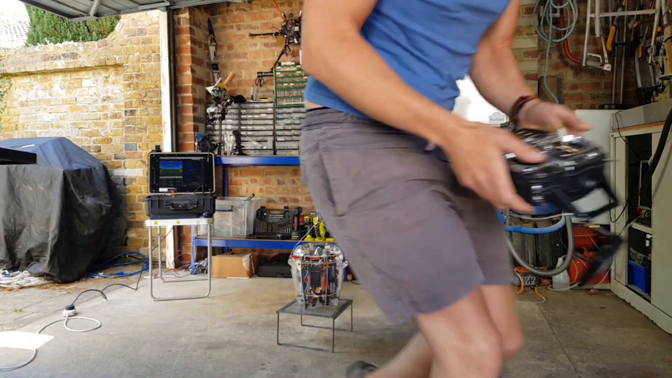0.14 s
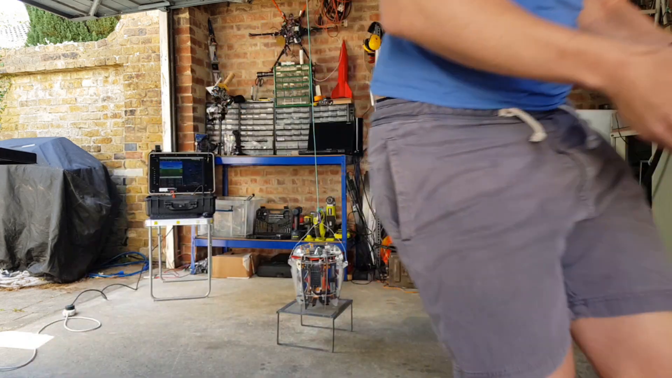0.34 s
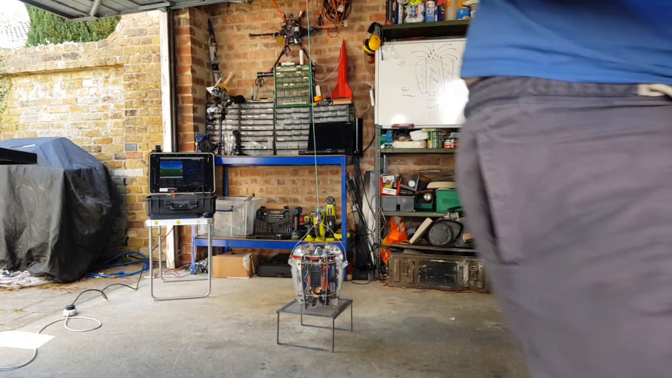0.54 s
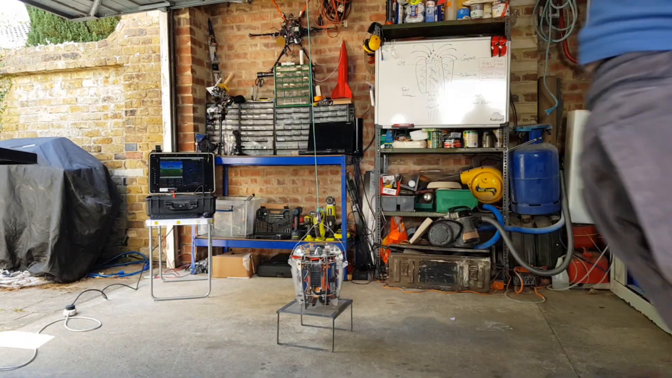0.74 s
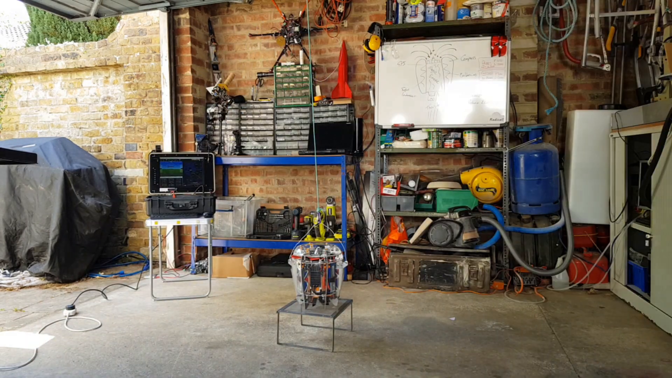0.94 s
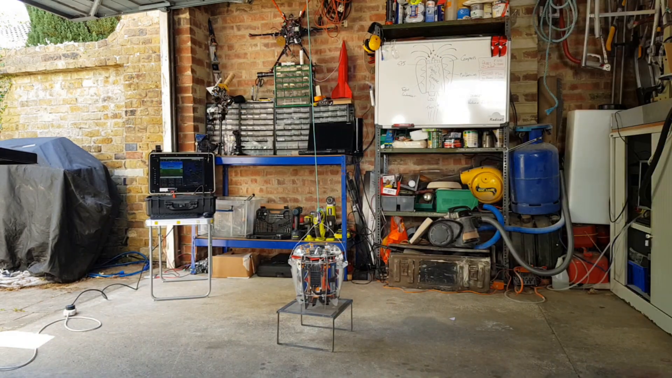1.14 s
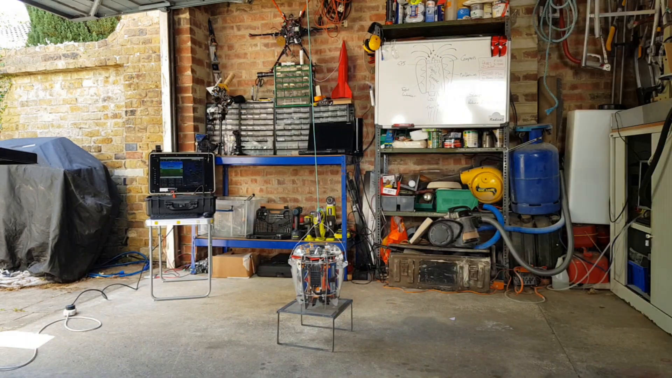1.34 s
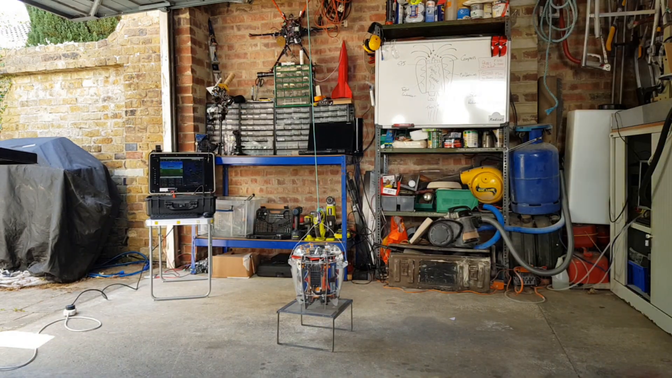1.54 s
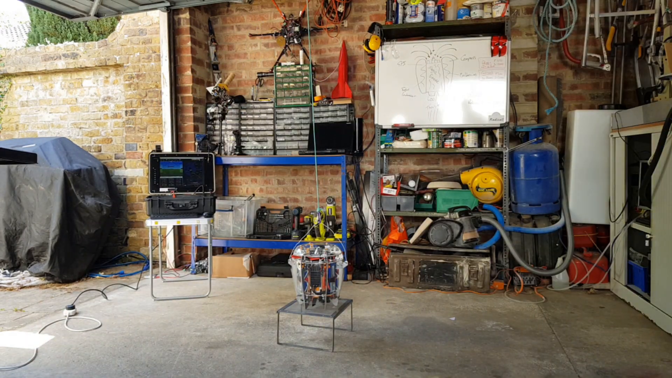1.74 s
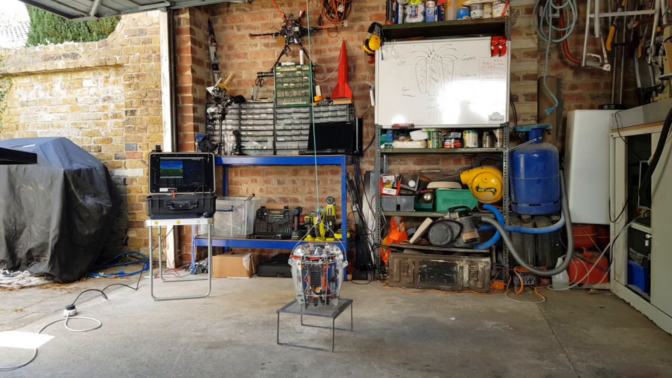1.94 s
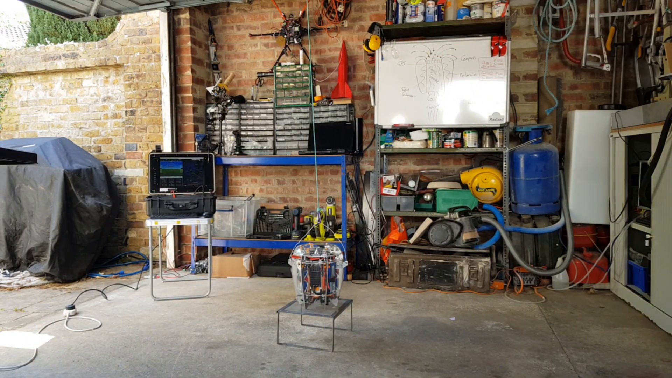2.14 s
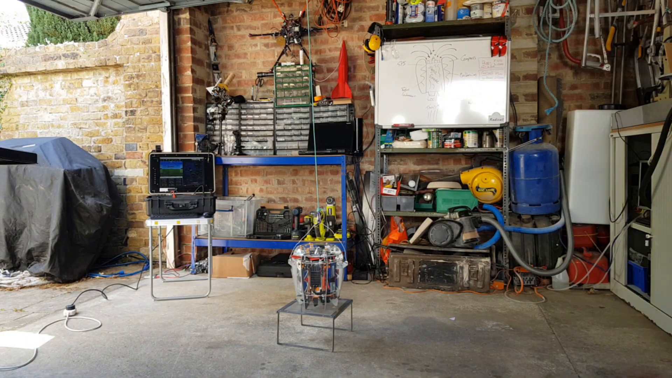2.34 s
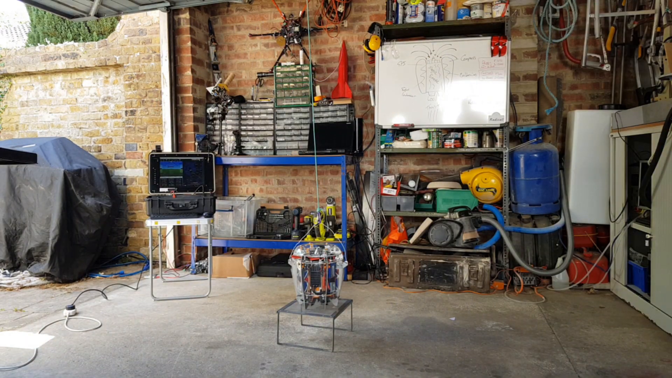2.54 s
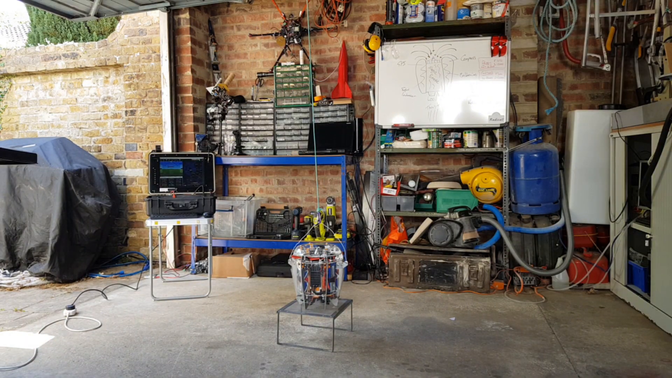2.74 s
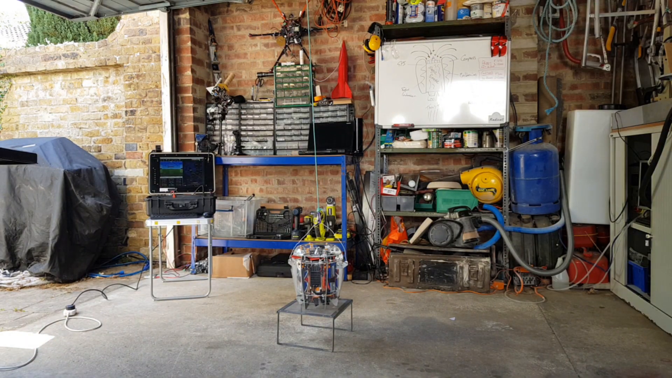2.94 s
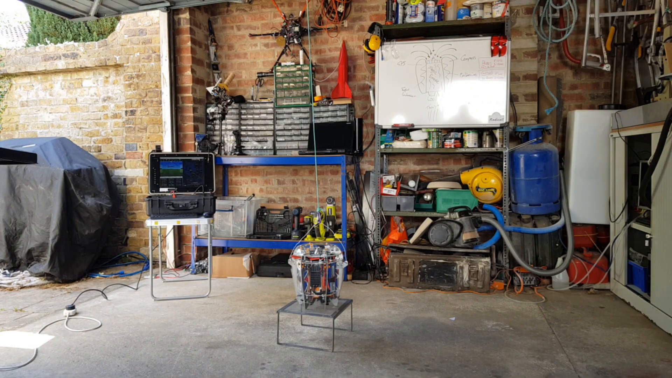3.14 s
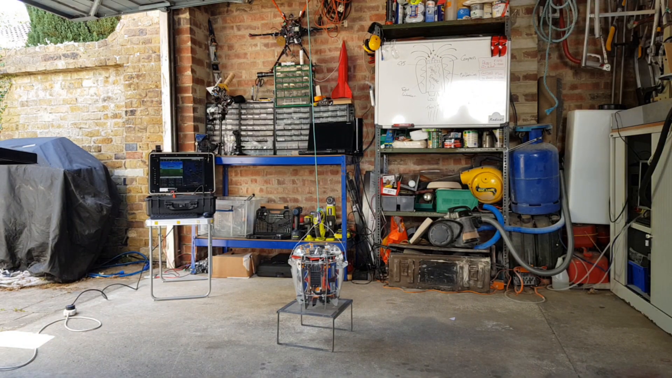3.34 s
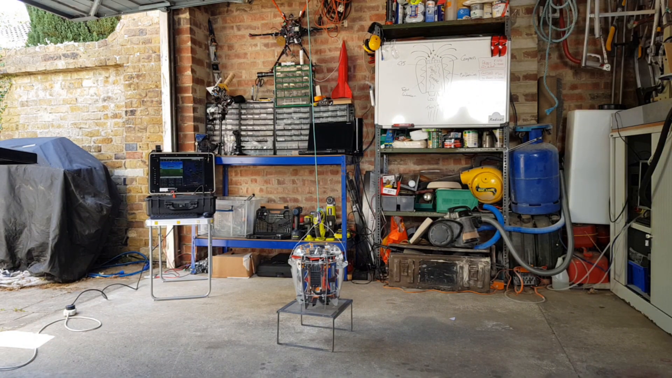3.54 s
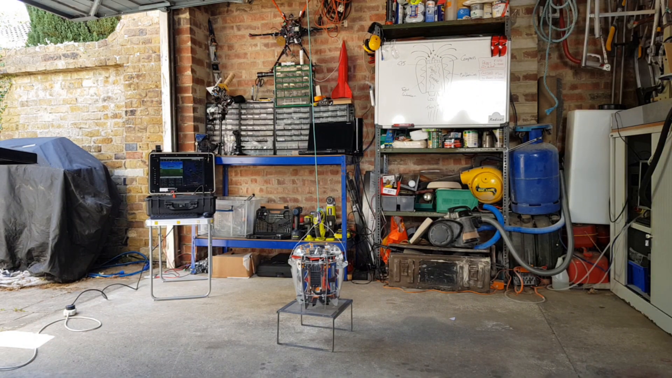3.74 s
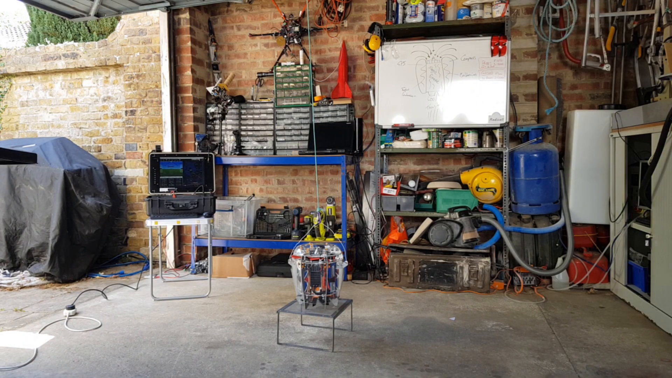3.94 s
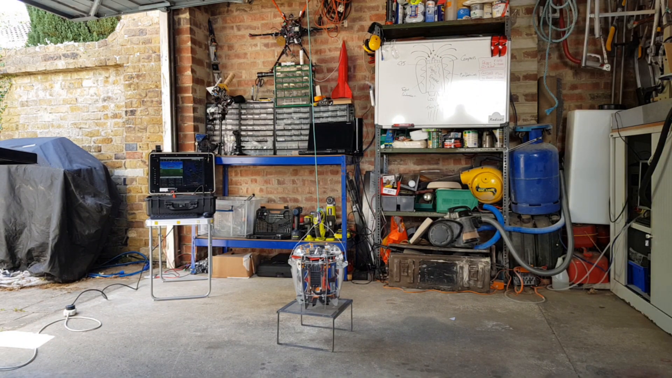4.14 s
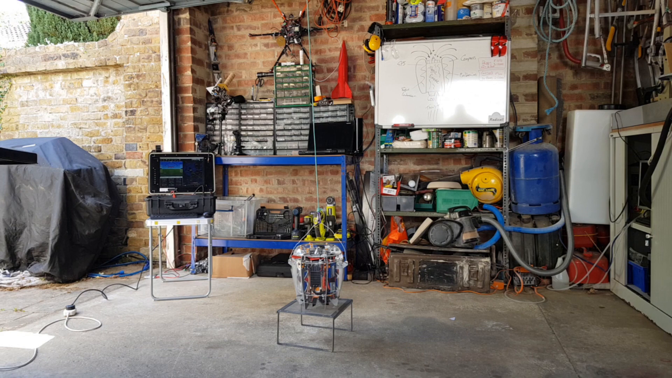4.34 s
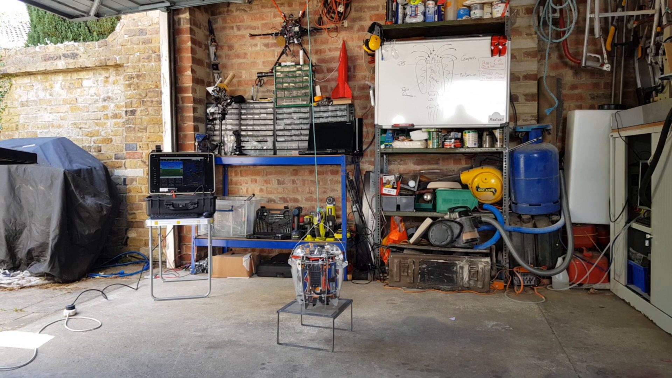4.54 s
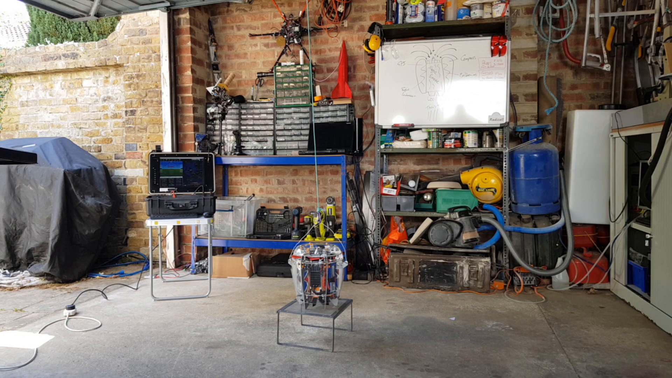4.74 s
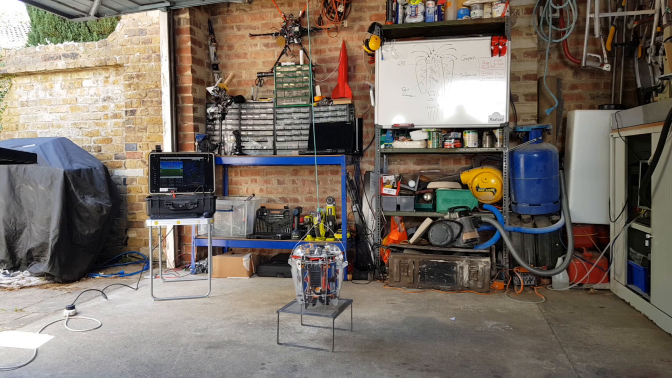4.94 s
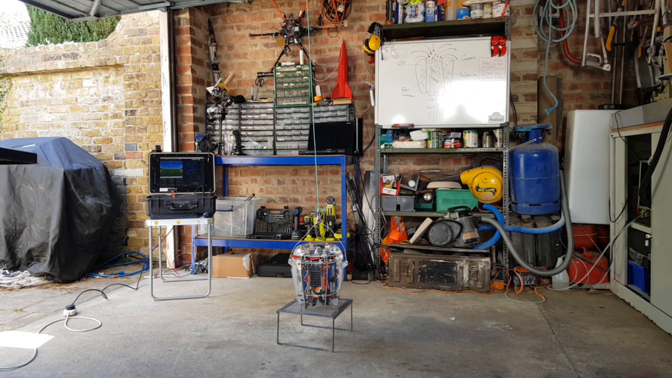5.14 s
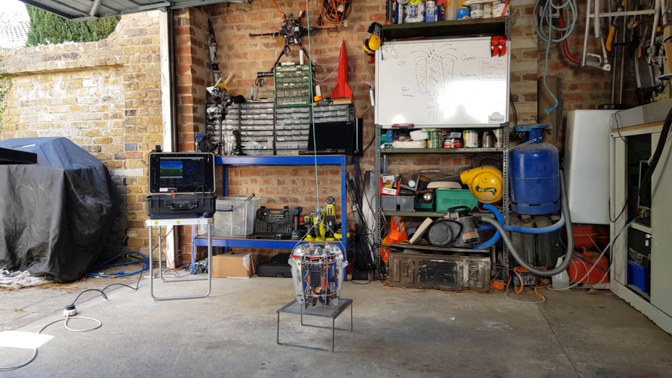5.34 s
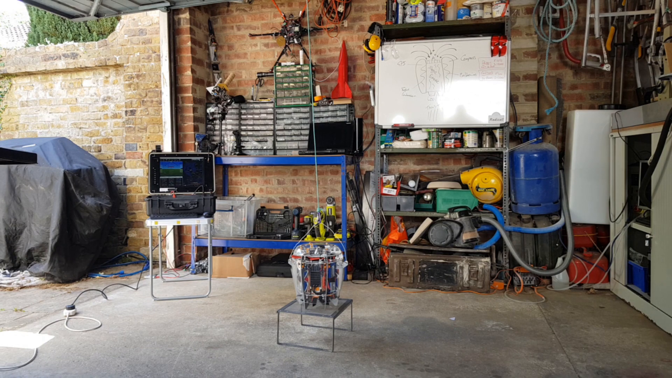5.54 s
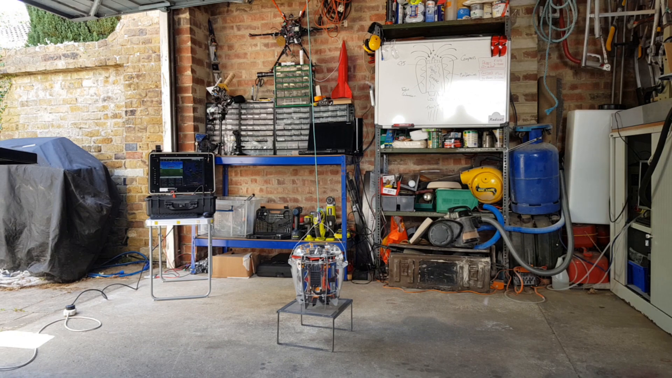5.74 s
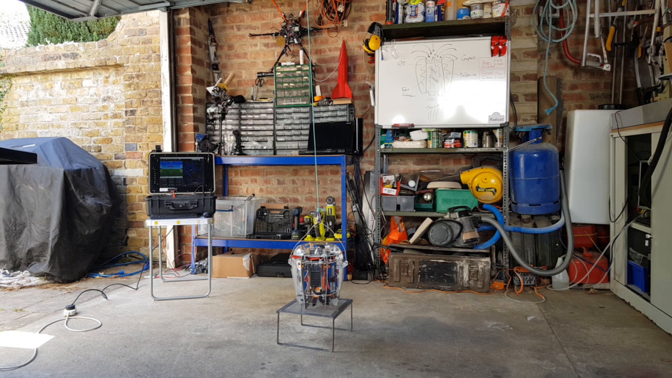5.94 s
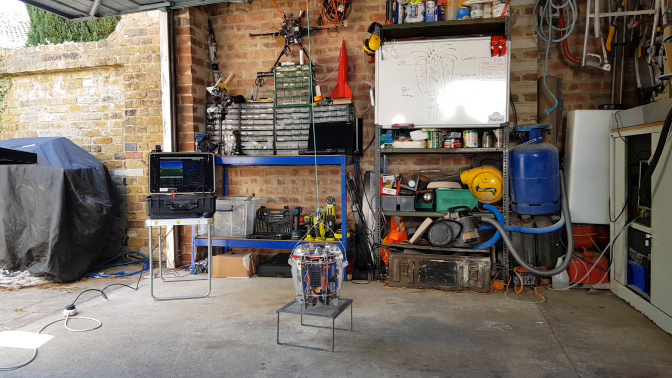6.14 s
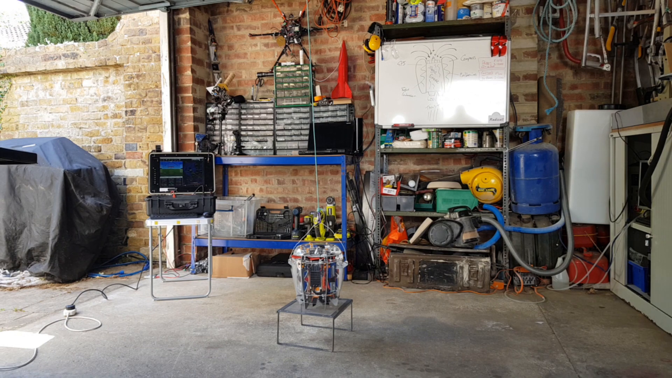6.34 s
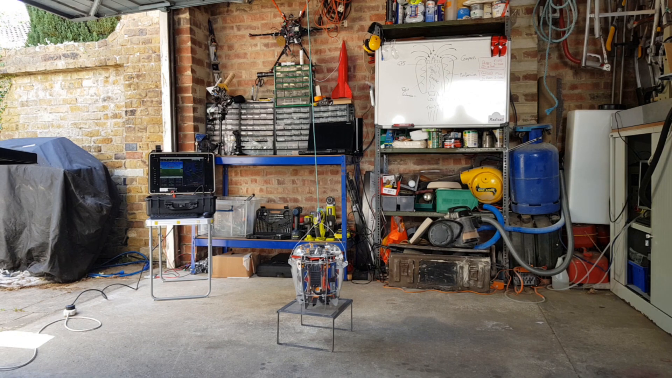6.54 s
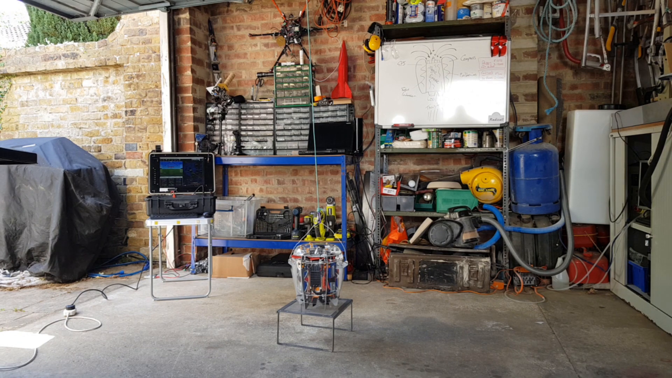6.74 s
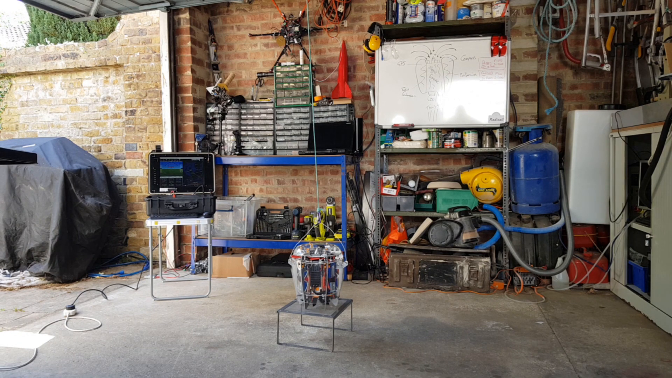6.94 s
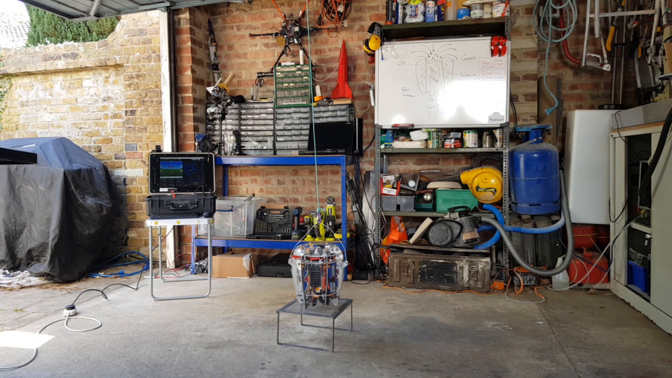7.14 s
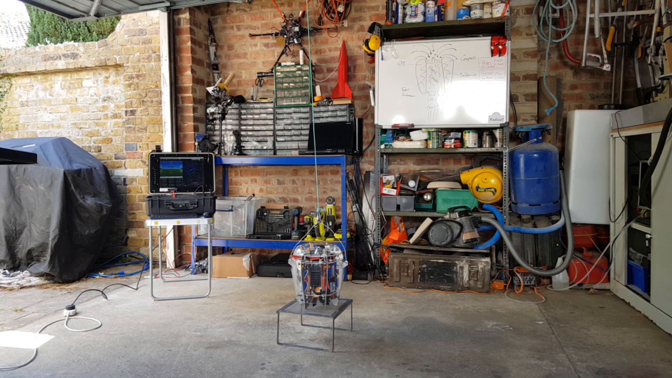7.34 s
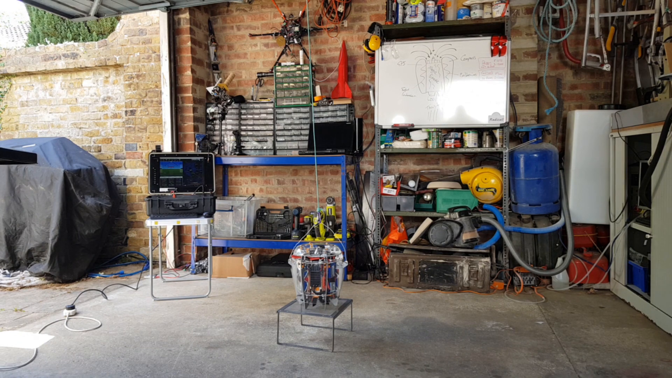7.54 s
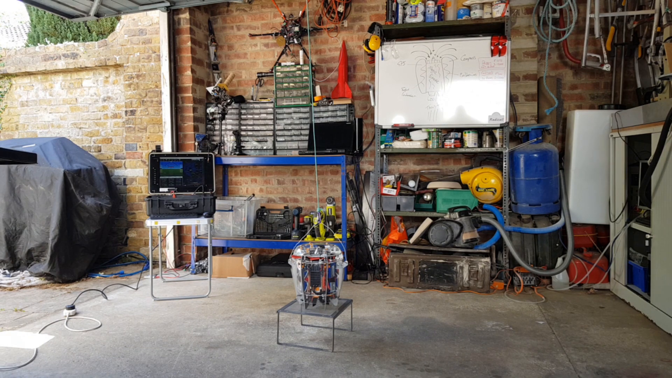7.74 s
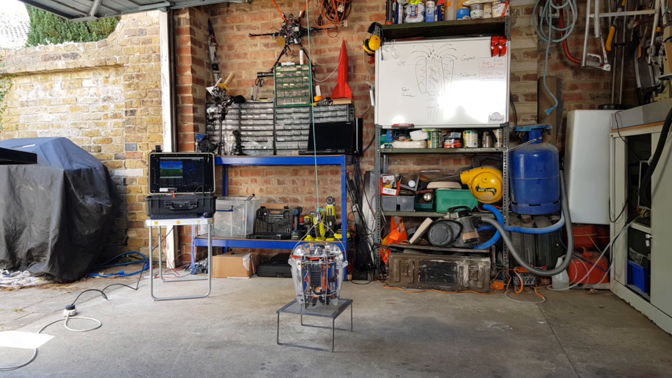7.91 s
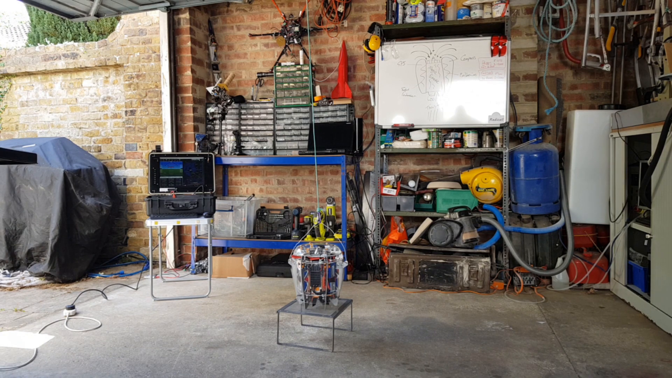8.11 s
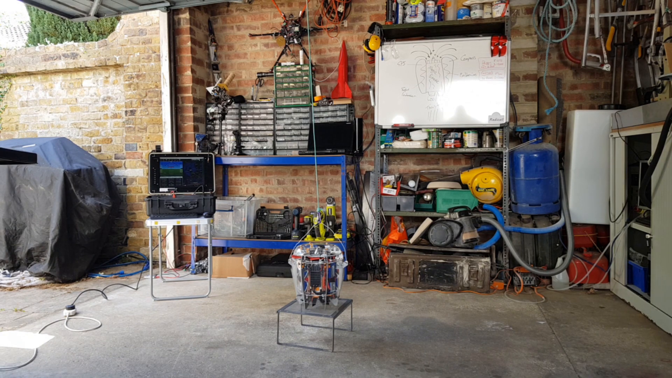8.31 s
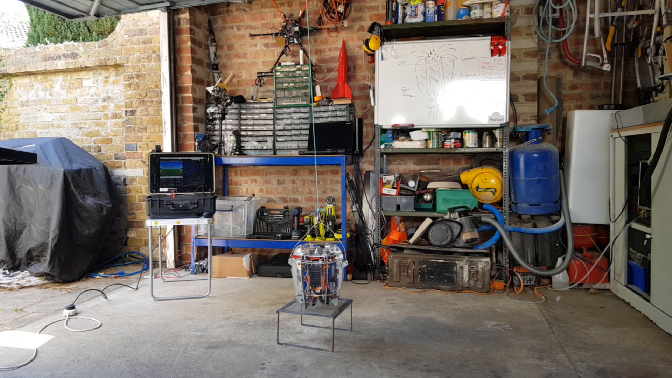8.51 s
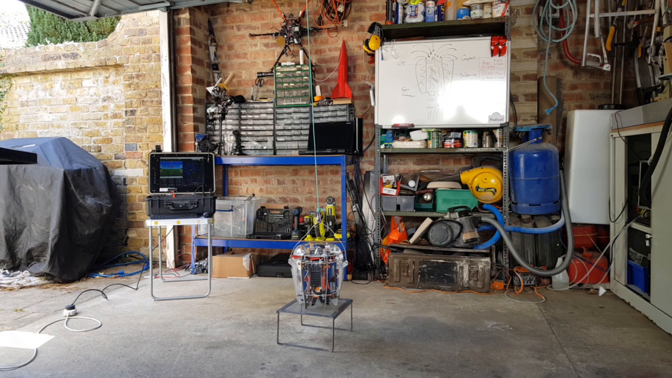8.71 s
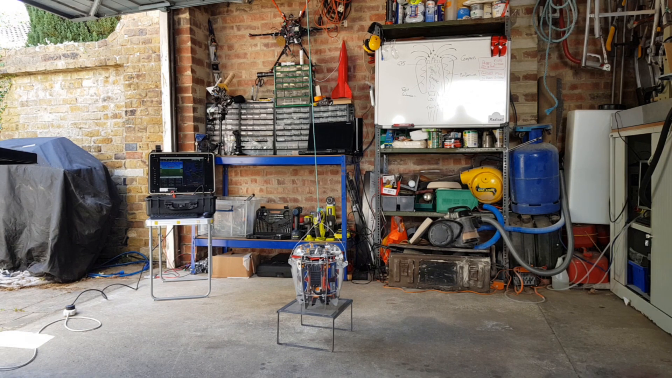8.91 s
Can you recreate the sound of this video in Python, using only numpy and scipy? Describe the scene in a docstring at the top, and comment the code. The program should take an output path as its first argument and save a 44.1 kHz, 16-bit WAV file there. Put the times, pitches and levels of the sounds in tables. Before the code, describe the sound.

Someone walks past and stops; after a pause, a drone's electric fan starts and climbs in steps, whining and hissing loudly.

```python
"""Footsteps pass in a brick garage, with scuffing soles, rustling clothes and a clicking transmitter.
The pilot stands still; a drone's twelve-blade electric ducted fan kicks in with a short buzz and
spools up in steps. Its blades whine, its shaft hums and its turbulent jet roars and hisses, all
following the fan speed, while the garage's standing waves swell and swallow the passing pitches."""
import sys
import numpy as np
from scipy import signal
from scipy.fft import rfft, irfft
from scipy.io import wavfile
from scipy.ndimage import uniform_filter1d, map_coordinates

SR = 44100
rng = np.random.default_rng(int(sys.argv[2]) if len(sys.argv) > 2 else 0)


def digitize_waveform(pressure):
    """Quantize a signal to 16-bit integers and store it at the path in sys.argv[1].

    Rows of a 2-D input are taken as channels; values are limited to [-1, 1].
    """
    field = np.atleast_2d(pressure).T
    bounded = np.clip(field, -1, 1)
    quanta = np.round(bounded * 32767).astype(np.int16)
    wavfile.write(sys.argv[1], SR, quanta)


N = 395577
T = np.arange(N) / SR
HZ = np.fft.rfftfreq(N, 1 / SR)
BLADES = 12

# Blade-passing rate in Hz at low, middle and high throttle.
THROTTLE_HZ = [1783, 2274, 2350]
# Stereo image of nearby noises. Each row: frequency in Hz, left-right correlation.
NEAR_LIKENESS = [(60, 0.46), (130, 0.47), (290, 0.86), (640, 0.52), (1410, 0.18), (3100, 0.13),
                 (6820, 0.34), (15000, 1)]
# Their lean to one side. Each row: frequency in Hz, left over right in dB.
NEAR_BALANCE = [(60, 0), (110, -2), (200, 2.0), (380, 1), (700, 3.5), (1290, 0.5), (2380, 4.5), (4400, -3),
                (8120, 0), (15000, 3.5)]


def amp(db):
    """Decibels to gain."""
    return 10 ** (np.asarray(db) / 20)


def unit(x):
    """Scales to rms 1."""
    return x / np.sqrt(np.mean(abs(x) ** 2) + 1e-20)


def read(points, hz):
    """Reads a table on a log-frequency axis."""
    f, value = np.transpose(points)
    return np.interp(np.log(hz + 1), np.log(f + 1), value)


def curves(rows):
    """One value a sample for every column of a timed table."""
    s, *columns = np.transpose(rows)
    return [np.interp(T, s, c) for c in columns]


def add(mix, s, sound):
    """Mixes a stereo sound in at s seconds."""
    part = mix[:, max(round(s * SR), 0):][:, :sound.shape[1]]
    part += sound[:, :part.shape[1]]


def band(x, low_hz, high_hz, order=2):
    """Band-pass filter."""
    sos = signal.butter(order, [low_hz, min(high_hz, SR / 2 - 1)], "band", fs=SR, output="sos")
    return signal.sosfilt(sos, x)


def bell(hz, centre_hz, width_hz):
    """Gaussian bump of height 1."""
    return np.exp(-((hz - centre_hz) / width_hz) ** 2)


def drift(rate_hz):
    """A complex random curve of rms 1, wandering about rate_hz times a second."""
    knots = rng.standard_normal((2, N // 64))
    grid_s = np.arange(0, N, 32) / SR
    real, imag = (np.interp(T, grid_s, map_coordinates(k, [grid_s * rate_hz], mode="wrap"))
                  for k in knots)
    return unit(real + 1j * imag)


def partial(turns, scatter, rate_hz):
    """A tone of rms about 1, part steady and part scattered differently to each side."""
    height = 1 + scatter * np.array([drift(rate_hz), drift(rate_hz)])
    return np.sqrt(2 / (1 + scatter ** 2)) * (height * np.exp(2j * np.pi * turns)).real


def noise(colour_db, likeness=NEAR_LIKENESS, balance=NEAR_BALANCE):
    """Spectrum of a stereo noise with a given colour and stereo image."""
    left, other = rfft(rng.standard_normal((2, N)))
    same = np.clip(read(likeness, HZ), -1, 1)
    right = same * left + np.sqrt(1 - same ** 2) * other
    side_db = read(balance, HZ) / 2
    return np.array([left * amp(side_db), right * amp(-side_db)]) * amp(colour_db)


def level_in(spectrum, low_hz, high_hz):
    """Rms of the centre signal within a band."""
    return irfft(spectrum.mean(0) * ((HZ > low_hz) & (HZ < high_hz)), N).std()


def patches(spectrum, depth_db, span_hz, span_s):
    """Turns a spectrum into sound whose colour churns in small patches of time and frequency."""
    frames = signal.stft(irfft(spectrum, N), nperseg=512)[2]
    hz, t = np.meshgrid(np.linspace(0, SR / 2, frames.shape[1]),
                        np.linspace(0, N / SR, frames.shape[2]), indexing="ij")
    field = map_coordinates(rng.standard_normal((200, 400)), [hz / span_hz, t / span_s],
                            order=1, mode="wrap")
    return signal.istft(frames * amp(depth_db * unit(field)), nperseg=512)[1][:, :N]


def strokes(rows, attack_s, release_db_per_s):
    """Envelope of strokes that ramp up and then fade once their hold time is over."""
    return sum(np.clip((T - s) / attack_s, 0, 1)
               * amp(db - release_db_per_s * np.maximum(T - s - hold, 0)) for s, hold, db in rows)


def garage(x, first_s=0.0055):
    """Dense reflections from walls and shelves, each band dying at its own speed."""
    # Reverb time. Each row: frequency in Hz, seconds to fall 60 dB.
    t60 = [(100, 0.17), (500, 0.28), (2000, 0.27), (6000, 0.13), (15000, 0.16)]
    taps = rng.standard_normal((2, SR // 2)) * (rng.random((2, SR // 2)) < .12)
    taps[:, :round(first_s * SR)] = 0
    hz, t, (left, other) = signal.stft(taps, SR, nperseg=256)
    same = (1 / (1 + (hz / 600) ** 2))[:, None]  # long waves reach both sides alike
    frames = np.array([left, same * left + np.sqrt(1 - same ** 2) * other])
    tail = signal.istft(frames * amp(-60 * t / read(t60, hz)[:, None]), SR, nperseg=256)[1]
    return signal.fftconvolve(x, tail / np.linalg.norm(tail[0]), axes=1)[:, :N]


def room_tone(sizzle_hz=2310, sizzle_width_hz=590, whine_hz=4915):
    """Still air and faint hiss, a narrow sizzle on the left and the thin whine of standby electronics."""
    # Colour of air and hiss. Each row: frequency in Hz, relative level in dB.
    colour = [(25, -24), (53, -1), (80, -12.5), (150, -20), (300, -20.5), (600, -26.5), (1300, -32.5),
              (2400, -28), (4000, -32), (6000, -36), (8000, -40), (10000, -33), (12500, -26),
              (16000, -28.5)]
    air = amp(-67.5) * unit(irfft(noise(read(colour, HZ)), N))
    sizzle_shape = 1 / (1 + ((HZ - sizzle_hz) / sizzle_width_hz) ** 2) ** 2.7
    sizzle = amp(-59.5) * unit(irfft(rfft(rng.standard_normal(N)) * sizzle_shape, N))
    whine = amp(-87.5) * partial(whine_hz * T, scatter=2.5, rate_hz=55)
    return air * amp([[1], [-1]]) + sizzle * amp([[0], [-28]]) + whine


def scuffs(grain_db=1.0, left_lag_s=.00023):
    """Soles scrape the floor: noise broken into fine sticks and slips."""
    # Colour of a scrape. Each row: frequency in Hz, relative level in dB.
    colour = [(290, -37), (500, -8), (1130, -3.5), (1620, -12), (2700, 0), (4030, -12.5), (4400, -7),
              (7210, -6), (11600, -0.5), (15000, -7), (16000, -10)]
    # Scrapes. Each row: start in seconds, hold in seconds, level in dB.
    scrapes = [(0.097, 0.052, -48.5), (0.19, 0.083, -54.5), (0.519, 0.039, -30.5)]
    scuff = unit(irfft(noise(read(colour, HZ)), N))
    scuff *= strokes(scrapes, attack_s=0.016, release_db_per_s=305) * amp(grain_db * drift(500).real)
    scuff[0] = np.roll(scuff[0], round(left_lag_s * SR))  # the pilot passes on the right
    return scuff


def footsteps(rise_s=0.00031, skirt_db=4, walked_off_s=1.45, far_thump_db=-13, wet_db=-7):
    """Shoes land on concrete with a sharp blow and a brief crunch, dull when heavy, bright when light."""
    # Footfalls, and last a knock within the rubbing groan. Each row: start in seconds, level in dB, centre in
    # Hz, decay in seconds.
    footfalls = [(0.103, -41.5, 466, 0.036), (0.172, -41.5, 64.7, 0.032), (0.197, -42, 250, 0.014),
                 (0.246, -40.5, 404, 0.018), (0.521, -43.5, 210, 0.057), (0.575, -40.5, 135, 0.019),
                 (0.635, -44, 221, 0.032), (1.018, -44, 200, 0.035), (1.045, -43.5, 120, 0.043),
                 (1.079, -43.5, 172, 0.065), (1.189, -53.5, 70, 0.18), (1.485, -36, 560, 0.0055),
                 (1.609, -47.5, 950, 0.0091), (1.692, -37, 229, 0.014), (1.797, -40, 710, 0.036),
                 (1.91, -47.5, 800, 0.013), (2.092, -34, 845, 0.0078), (2.186, -42.5, 382, 0.028),
                 (2.258, -30.5, 1170, 0.0088), (2.418, -36.5, 796, 0.0075), (2.543, -39, 610, 0.021),
                 (2.731, -39, 190, 0.012), (2.752, -34.5, 606, 0.0074), (3.065, -43.5, 726, 0.014),
                 (3.393, -50, 1400, 0.13)]
    # Thump, thud, knock of the sole and slap. Each row: low edge in Hz, high edge in Hz.
    layers = [(40, 97), (75, 238), (230, 776), (700, 1960)]
    out, t = np.zeros((2, N)), np.arange(SR // 3) / SR
    for s, level_db, centre_hz, decay_s in footfalls:
        push = np.exp(-t / decay_s) * (1 - np.exp(-t / rise_s))
        for low_hz, high_hz in layers:
            hz = np.sqrt(low_hz * high_hz)
            db = level_db - skirt_db * np.log2(hz / centre_hz) ** 2
            # the deepest thump carries only while the pilot is close
            db += (s > walked_off_s) * far_thump_db / (1 + (hz / 89) ** 4)
            crunch = unit(band(rng.standard_normal(len(t)) * push, low_hz, high_hz, order=3))
            blow = unit(band(1. * (t == 0), low_hz, high_hz))
            add(out, s, amp(db) * unit(crunch - 0.19 * blow) * push.std() * amp([[1.5], [-1.5]]))
    boom = signal.lfilter(*signal.iirpeak(178, 9, fs=SR), out)  # a standing wave between the walls
    hollow = signal.lfilter(*signal.iirpeak(110, 2, fs=SR), out)  # a lower one, heard near its node
    out = out + boom - 0.63 * hollow
    return out + amp(wet_db) * garage(out)


def clicks(rise_s=0.00036, decay_s=0.003, bounce_s=0.0063, bounce_db=-7, wet_db=-7):
    """Transmitter and grit give tiny hard snaps, each with one bounce off the floor."""
    # Snaps. Each row: start in seconds, level in dB, left over right in dB, centre in Hz.
    snaps = [(0.107, -39, 2, 9000), (0.205, -33.5, 2, 9000), (0.287, -41, 0, 7000), (0.529, -32, -10, 7700),
             (0.564, -23, -4, 11000), (0.735, -29, -3.5, 5620), (0.95, -36.5, -9.5, 7550),
             (0.984, -35, -6.5, 8000), (0.996, -35, -12, 10000), (1.048, -27.5, -5.5, 10000),
             (1.058, -26, 4, 11000), (1.091, -33, -7, 5960), (1.113, -33.5, -14, 6500),
             (1.1532, -21, -7.5, 9100), (1.295, -41, -5, 6750), (1.3215, -41, -5, 6300),
             (1.498, -24.5, 1, 9900), (1.812, -25, 2, 9300), (2.095, -37, 6, 4000), (2.419, -34.5, 2, 8000),
             (3.394, -35.5, 3, 3960)]
    out, t = np.zeros((2, N)), np.arange(SR // 40) / SR
    envelope = np.exp(-t / decay_s) * (1 - np.exp(-t / rise_s))
    for s, db, pan_db, hz in snaps:
        shared, *own = rng.standard_normal((3, len(t))) * envelope
        snap = band(shared + 0.79 * np.array(own), hz * 0.56, hz * 2.4, order=4)
        snap = snap / abs(snap).max() * amp(db + 0.5) * amp([[pan_db / 2], [-pan_db / 2]])
        snap[0] = np.roll(snap[0], int(max(-pan_db * 3.5, 0)))  # snaps on the right reach the left late
        add(out, s, snap)
        add(out, s + bounce_s * rng.uniform(0.92, 1.15), amp(bounce_db) * snap)
    return out + amp(wet_db) * garage(out)


def rustle(grain_db=2.0):
    """Cloth rubs on cloth: a churning noise, grainy with sticks and slips."""
    # Colour of the cloth. Each row: frequency in Hz, relative level in dB.
    colour = [(88, -39), (150, -6), (186, -29), (209, -25), (406, 0), (905, -7), (1340, 2.5), (1560, -1.5),
              (2220, -2.5), (2400, -2.5), (3040, 0.5), (8400, -4.5), (9630, -11.5), (12200, -8),
              (16000, -22)]
    # Spells of rubbing. Each row: start in seconds, hold in seconds, level of the treble in dB.
    rubs = [(0.25, 1.18, -71), (1.0, 0.13, -58), (1.43, 2.082, -55)]
    spectrum = noise(read(colour, HZ))
    cloth = patches(spectrum, depth_db=2.9, span_hz=201.7, span_s=0.039)
    cloth /= level_in(spectrum, 2960, 15000)
    return cloth * strokes(rubs, attack_s=0.061, release_db_per_s=185) * amp(grain_db * drift(300).real)


def groan():
    """A brief rubbing groan of rough tones as the rustle ends."""
    # Resonances. Each row: frequency in Hz, width in Hz, relative level in dB.
    modes = [(581, 50, -1), (969, 26, -13), (1770, 230, -5), (3480, 44, -14)]
    # The rub. Each row: start in seconds, hold in seconds, level in dB.
    rubs = [(3.38, 0.089, -50.5)]
    tones = sum(amp(db) * partial(hz * T, scatter=2.2, rate_hz=width) for hz, width, db in modes)
    return tones * strokes(rubs, attack_s=0.048, release_db_per_s=340)


def motor_on():
    """Rises from 0 to 1 as the motor is switched on."""
    return np.clip((T - 4.752) / 0.0045, 0, 1)


def starter(wet_db=-6):
    """The controller drags the motor round with a rising buzz, a rasp and a growl until it locks on."""
    # Glide of the buzz. Each row: time in seconds, pitch in Hz, level in dB.
    glide = [(4.755, 267, -67), (4.8, 327.4, -67), (4.83, 441, -42.5), (4.86, 508, -40), (4.89, 547, -34.5),
             (4.925, 555, -31.5), (4.95, 581, -35), (4.99, 622, -47), (5.03, 632, -65)]
    # Its harmonics. Each row: multiple of the pitch, relative level in dB.
    harmonics = [(1, 1.5), (2, -14), (3, -7.5), (4, -16), (5, -18), (6, -35), (7, -24)]
    # The frame growls. Each row: start in seconds, hold in seconds, level in dB.
    growls = [(4.745, 0.071, -44), (4.92, 0.14, -44)]
    # The motor rasps as it catches. Each row: start in seconds, hold in seconds, level in dB.
    rasps = [(4.753, 0.064, -54.5), (4.875, 0.05, -47)]
    hz, level_db = curves(glide)
    turns = np.cumsum(hz) / SR
    buzz = sum(amp(db) * partial(k * turns, scatter=.42, rate_hz=70) for k, db in harmonics)
    buzz *= amp(level_db - 1) * motor_on() * (T < glide[-1][0])
    growl = unit(band(rng.standard_normal(N), 326, 1000))
    growl *= strokes(growls, attack_s=0.031, release_db_per_s=130)
    rasp = unit(band(rng.standard_normal((2, N)), 820, 10000, order=1))
    rasp *= strokes(rasps, attack_s=.008, release_db_per_s=256)
    out = buzz + growl + rasp
    return out + amp(wet_db) * garage(out)


def thrust(blade_hz, jet_onset_hz=1103, surge_hz_per_s=1550):
    """Levels of roar and hiss in dB: both follow fan speed, with a surge while it accelerates."""
    speed = blade_hz / THROTTLE_HZ[0]
    climb_hz_per_s = uniform_filter1d(np.gradient(blade_hz) * SR, size=4000)
    surge_db = np.clip(climb_hz_per_s / surge_hz_per_s, 0, 1) * np.minimum(speed, 1) ** 2
    unformed = 1 / (1 + (blade_hz / jet_onset_hz) ** 20)  # a slow fan has hardly any jet
    roar_db = -32 + 7.5 * np.log2(speed) + surge_db - 3.5 * unformed
    hiss_db = -34.5 + 11.5 * np.log2(speed) + surge_db - 5 * unformed
    return roar_db, hiss_db


def jet(blade_hz, roar_db, hiss_db, split_hz=2900, gust_db=1.12):
    """Turbulent exhaust: a gusty roar and hiss, shaped by the garage's standing waves."""
    # Colour of the exhaust. Each row: frequency in Hz, relative level in dB.
    colour = [(30.0, -32), (70.0, -24.5), (130.0, -17), (220.0, -13), (400.0, -8.5), (800.0, -3.5),
              (1250.0, 1), (2000.0, -4.5), (3000.0, -9), (4200.0, -14), (6800.0, -14.5), (9000.0, -19.5),
              (12500.0, -17.5), (15700.0, -24.5)]
    # Peaks and notches between fan, floor and walls. Each row: centre in Hz, width in Hz, gain in dB.
    room_modes = [(177, 68, -4.5), (351, 37, -3.5), (418, 43, 6), (509, 7.2, -10.5), (655, 21, 2.5),
                  (722, 40, -3.5), (751, 19, 6.5), (879, 14.5, -9), (1055, 35, 3.5), (1112, 31, -14),
                  (1177, 57, 4), (1465, 10, 7.5), (1788, 9.1, 8.5), (2000, 34, -2.5), (2333, 34, 2.5),
                  (2450, 48, -5), (2680, 77.0, -4.5), (2718, 39, 7.5)]
    # Stereo image. Each row: frequency in Hz, left-right likeness (1 or more is fully alike).
    likeness = [(60, 2), (92, 3.5), (140, 0.5), (210, 1.5), (330, 0.8), (500, 0.93), (770, 0.5),
                (1170, 0.57), (1790, 0.02), (2740, 0.5), (4190, 0.09), (6410, 0.08), (9810, 0.72),
                (15000, 0.67)]
    # Lean to one side. Each row: frequency in Hz, left over right in dB.
    balance = [(60, 7), (92, 8), (140, -9), (210, 7.5), (330, -1.5), (500, 1.5), (770, 4), (1170, 1.0),
               (1790, 0), (2740, 1.5), (4190, -0.5), (6410, -5), (9810, 5.5), (15000, 0)]
    modes_db = sum(db * bell(HZ, hz, width) for hz, width, db in room_modes)
    spectrum = noise(read(colour, HZ) + modes_db, likeness, balance)
    low = 1 / (1 + (HZ / split_hz) ** 4)
    bass = 1 / (1 + (HZ / 260) ** 4)
    bass_db = -12 * np.clip(1 - blade_hz / THROTTLE_HZ[0], 0, 1)  # big eddies need a fast jet
    roar = irfft(spectrum * low * (1 - bass), N) + irfft(spectrum * low * bass, N) * amp(bass_db)
    roar *= amp(roar_db + gust_db * drift(35).real) / level_in(spectrum, 700, 1600)
    hiss = irfft(spectrum * (1 - low), N)
    hiss *= amp(hiss_db + gust_db * drift(45).real) / level_in(spectrum, 4000, 15000)
    return roar + hiss


def blade_whine(blade_hz, shaft_turns, roar_db):
    """The blade-passing tone swells and fades as its pitch crosses standing waves."""
    # Standing waves. Each row: centre in Hz, width in Hz, left gain in dB, right gain in dB.
    room_modes = [(1300, 66, 2, 3.5), (1430, 90, -11, -15), (1787, 16, 8, 8.5), (1817, 13.9, 0.5, 7.5),
                  (2200, 26, -8, -2.5), (2344, 31.7, 9, 7), (2395, 13, -3, -4), (2540, 18, 9, 9),
                  (2572, 11, -5, -1), (2590, 10, 6.5, 4.5), (2690, 36, 12, 7), (2770, 20, 3.5, 5)]
    modes_db = sum(np.outer(sides_db, bell(blade_hz, hz, width)) for hz, width, *sides_db in room_modes)
    flutter = np.interp(blade_hz, THROTTLE_HZ, [.27, .55, .5])  # the inflow is rougher under thrust
    waver_db = np.interp(blade_hz, THROTTLE_HZ + [2700], [0.8, 1.1, 1.21, 2.56]) * drift(24).real
    return amp(roar_db - 6 + modes_db + waver_db) * partial(BLADES * shaft_turns, flutter, rate_hz=37)


def shaft_orders(blade_hz, shaft_turns, roar_db, flare_db=4.0, frame_db=9.5):
    """Harmonics of the shaft's rotation; the frame rings as one sweeps through its resonance."""
    # Each row: multiple of the shaft speed (rounded for the pitch), then level against the roar
    # in dB at low, middle and high throttle.
    orders = [(1.93, -19, -15.5, -34), (3.98, -21, -15, -40), (5.98, -29, -20, -24), (6.95, -33, -33, -34),
              (8, -31, -13, -16), (24, -13, -15, -14), (36, -15, -29, -20), (40, -40, -12.5, -51),
              (48, -15.5, -62, -36), (50, -14, -38, -33.5), (60, -19, -16, -36)]
    spooling = np.clip((THROTTLE_HZ[0] - blade_hz) / 300, 0, 1)
    out = np.zeros((2, N))
    for order, *levels_db in orders:
        hz = order * blade_hz / BLADES
        db = roar_db + np.interp(blade_hz, THROTTLE_HZ, levels_db) + flare_db * drift(14).real
        db += spooling * (-7 if order > BLADES else 6)  # a slow rotor sounds duller
        db += frame_db * bell(hz, centre_hz=496, width_hz=72)
        radiated = 1 / (1 + (260 / hz) ** 4)  # a small duct cannot radiate slow pulses
        scatter = 0.8 * order / (order + 4)  # short waves scatter more
        out += amp(db) * radiated * partial(round(order) * shaft_turns, scatter, rate_hz=35)
    return out


def wake_whistles(blade_hz, shaft_turns, roar_db):
    """The blade wakes rush in fuzzy whistles that climb with the shaft speed."""
    # Each row: multiple of the shaft speed, width in Hz, then level against the roar in dB
    # at low, middle and high throttle.
    wakes = [(24.72, 260, -26, -9.5, -11), (31.37, 190, -25, -8, -8), (36.6, 210, -37, -19, -15),
             (40, 120, -34, -14, -39)]
    return sum(amp(roar_db + np.interp(blade_hz, THROTTLE_HZ, levels_db))
               * partial(order * shaft_turns, scatter=3.3, rate_hz=width)
               for order, width, *levels_db in wakes)


def shaft_hum(blade_hz, shaft_turns):
    """The unbalanced shaft hums at one cycle a turn."""
    # The hum as the garage carries it. Each row: shaft speed in Hz, level in dB.
    levels = [(85, -85), (120, -65), (141, -39.5), (152, -58.5), (164, -53), (185, -59), (199, -39.5),
              (211, -45.5), (233, -43.5)]
    return amp(read(levels, blade_hz / BLADES)) * partial(shaft_turns, scatter=0.11, rate_hz=39)


def rotor(blade_hz, roar_db, wobble=0.000766, glide_wet_db=-2):
    """All the fan's tones, locked to one slightly wobbling shaft."""
    shaft_turns = np.cumsum(blade_hz * (1 + wobble * drift(25).real)) / SR / BLADES
    tones = blade_whine(blade_hz, shaft_turns, roar_db)
    tones += shaft_orders(blade_hz, shaft_turns, roar_db)
    tones += wake_whistles(blade_hz, shaft_turns, roar_db)
    # in a fast climb the walls still return the lower pitches
    gliding = np.clip(np.gradient(blade_hz) * SR / 1500, 0, 1)
    return tones + shaft_hum(blade_hz, shaft_turns) + amp(glide_wet_db) * garage(tones * gliding)


def scene():
    """The pilot's walk, then the fan."""
    # A run-up, then throttle steps. Each row: time in seconds, blade-passing rate in Hz.
    fan_speed = [(4.76, 80), (4.93, 646), (5.1, 1196), (5.21, 1422), (5.3, 1709), (5.42, 1785), (5.6, 1788),
                 (6.3, 1789), (6.48, 1813), (6.63, 1817), (6.8, 2109), (6.95, 2240), (7.18, 2208),
                 (7.62, 2234), (7.68, 2310), (7.75, 2344), (7.96, 2353), (8.22, 2434), (8.33, 2535),
                 (8.72, 2670), (8.92, 2785)]
    blade_hz, = curves(fan_speed)
    roar_db, hiss_db = thrust(blade_hz)
    fan = motor_on() * (jet(blade_hz, roar_db, hiss_db) + rotor(blade_hz, roar_db)) + starter()
    pilot = footsteps() + clicks() + rustle() + scuffs() + groan()
    return room_tone() + pilot + fan


def record(dry, edge_hz=15900):
    """A steep low-pass trims the very top of the treble."""
    lowpass = signal.firwin(511, edge_hz, window=("kaiser", 9), fs=SR)
    return signal.oaconvolve(dry, lowpass[None], "same")


dry = scene()
out = record(dry)
digitize_waveform(out)
```